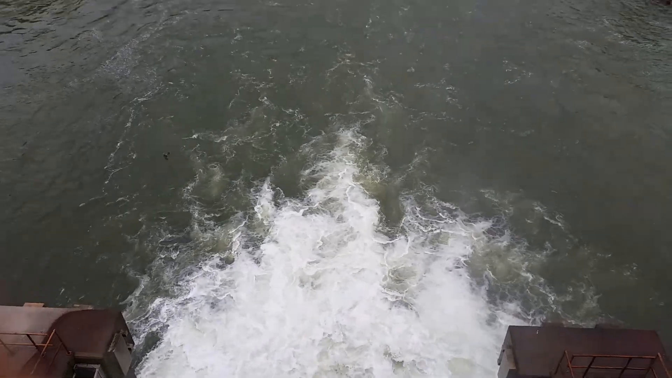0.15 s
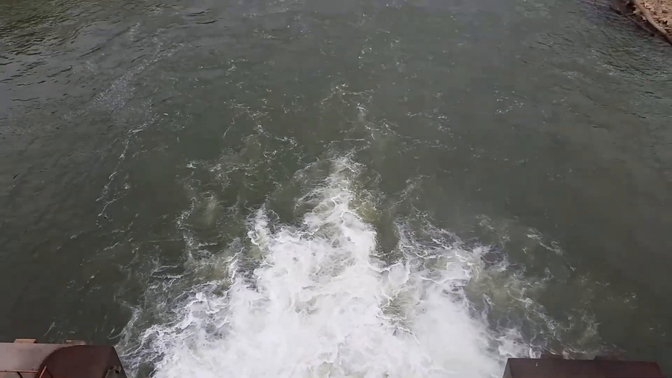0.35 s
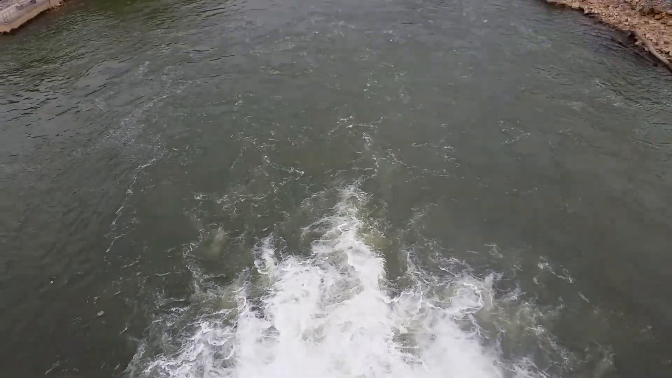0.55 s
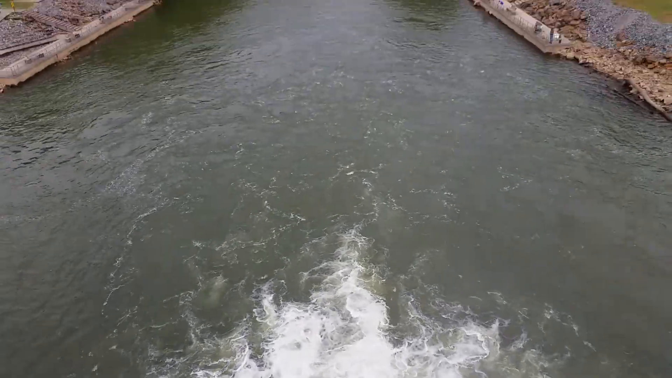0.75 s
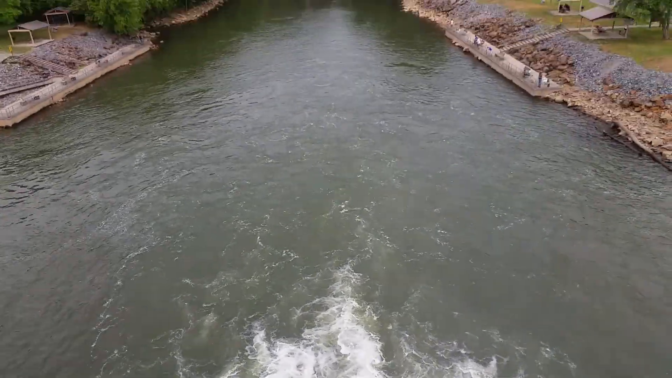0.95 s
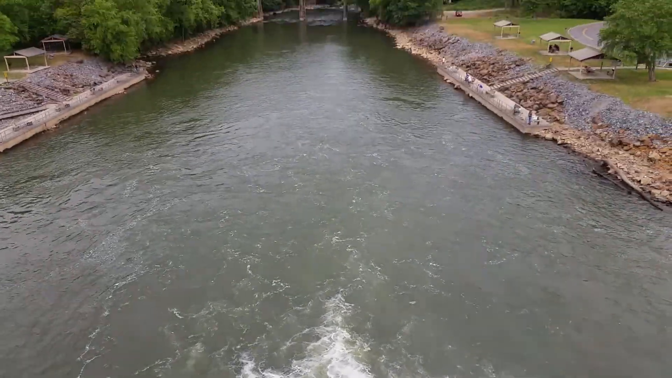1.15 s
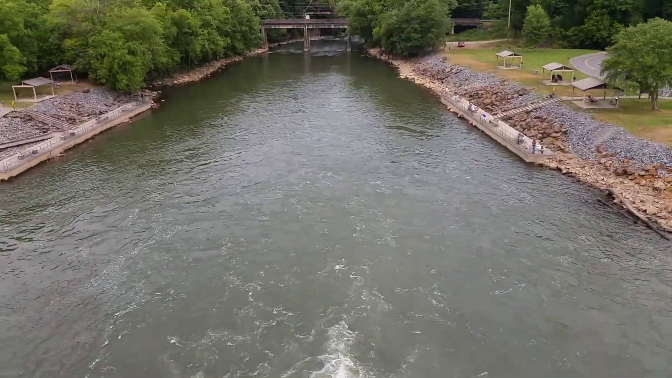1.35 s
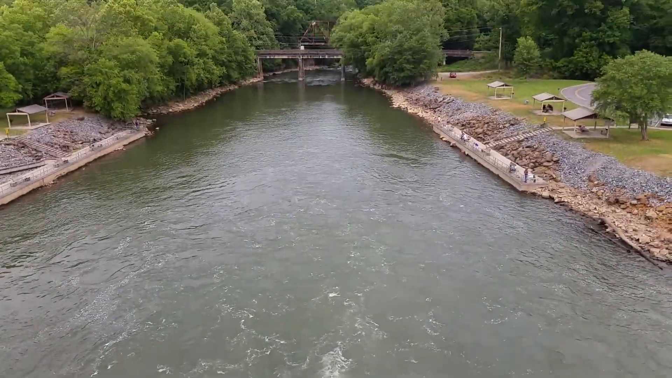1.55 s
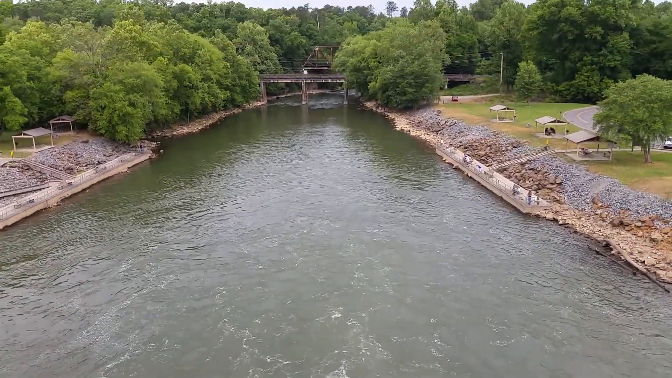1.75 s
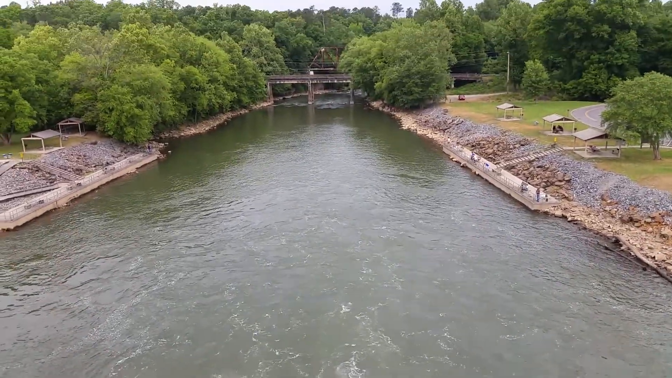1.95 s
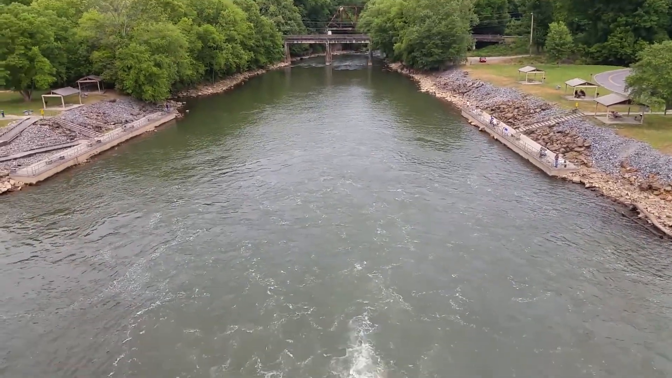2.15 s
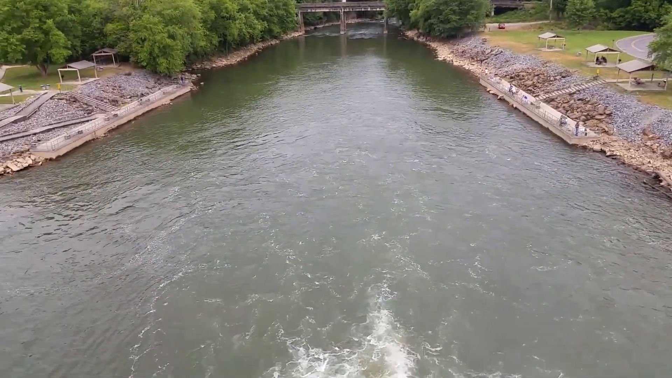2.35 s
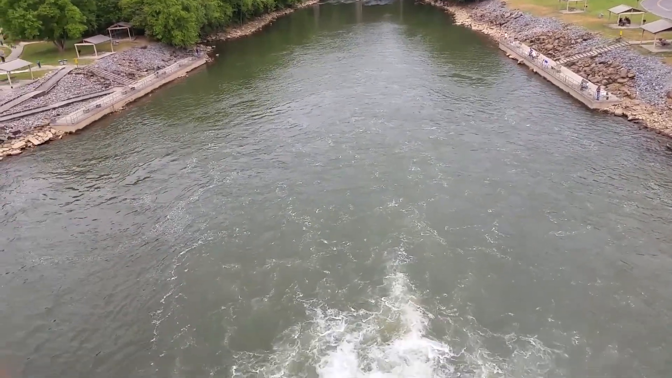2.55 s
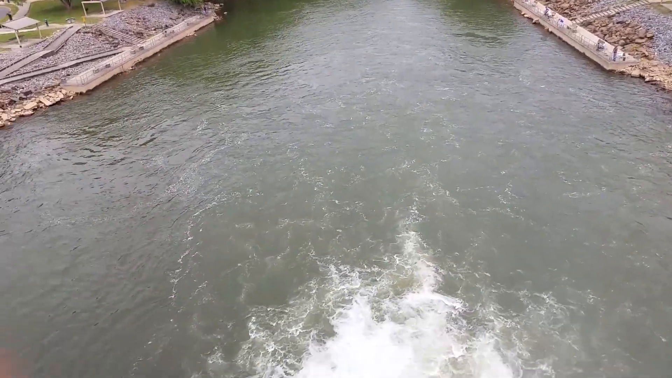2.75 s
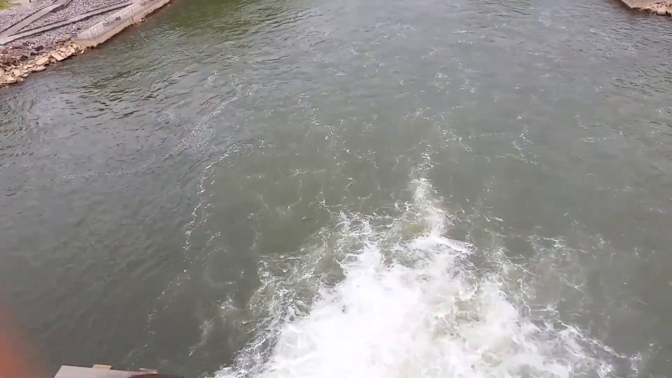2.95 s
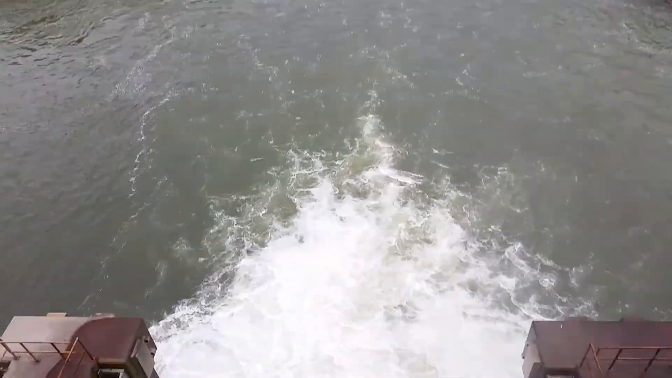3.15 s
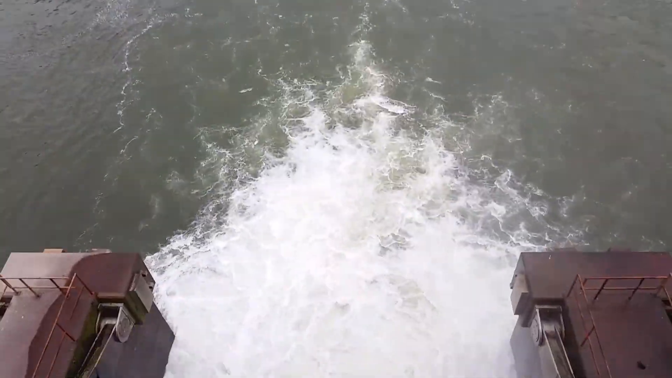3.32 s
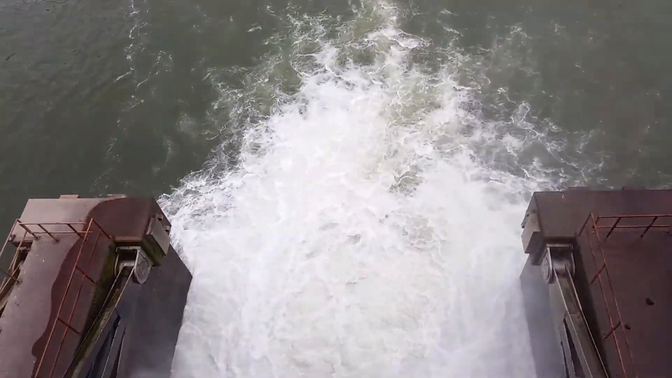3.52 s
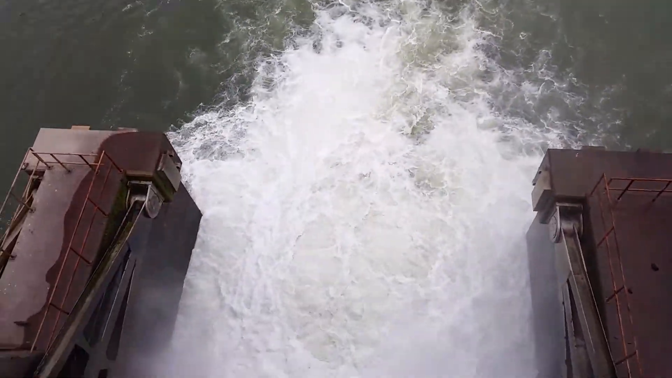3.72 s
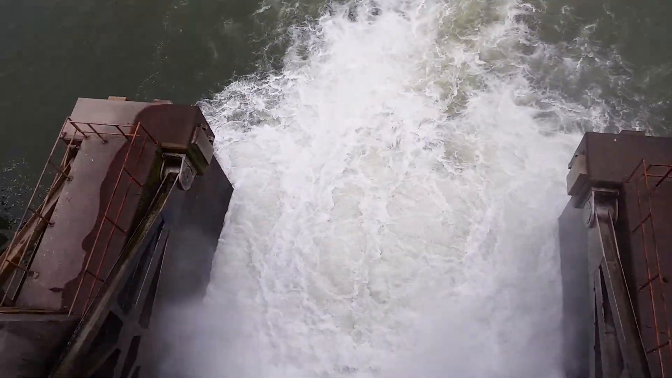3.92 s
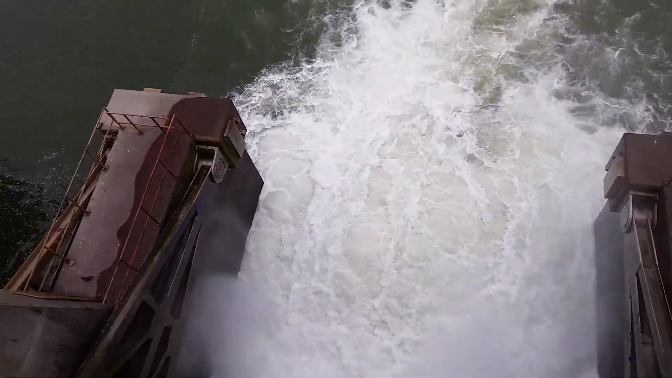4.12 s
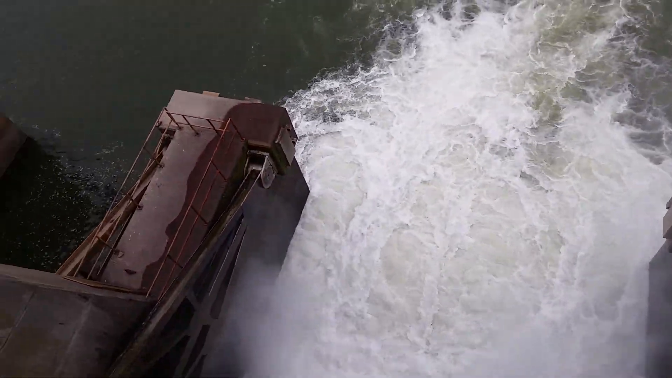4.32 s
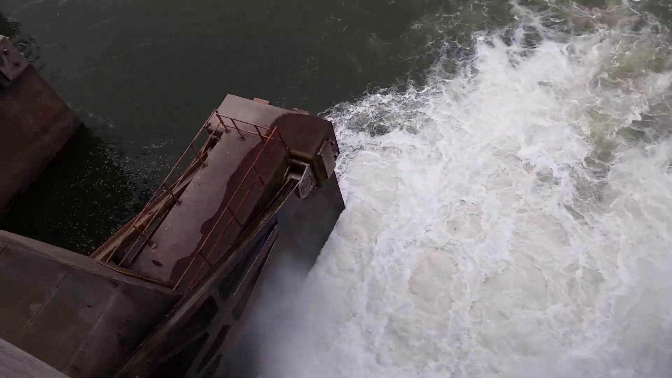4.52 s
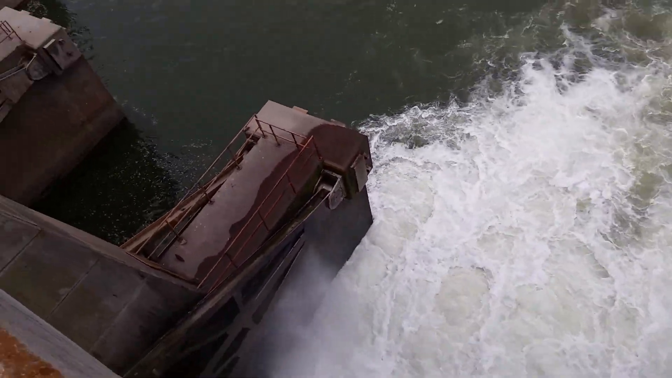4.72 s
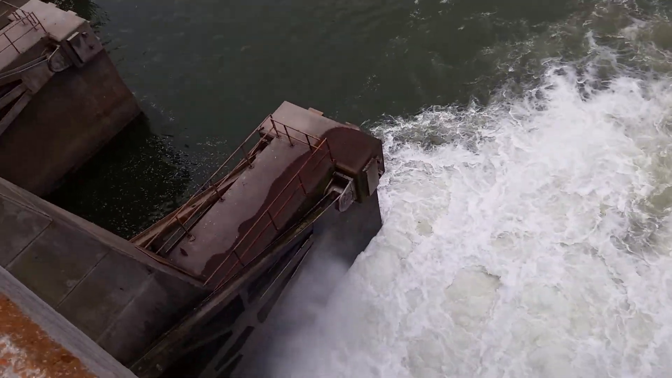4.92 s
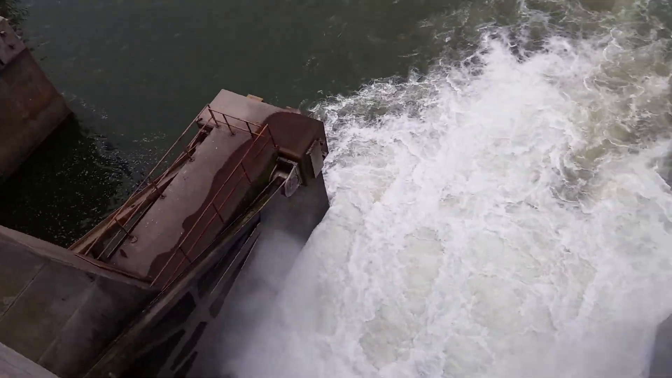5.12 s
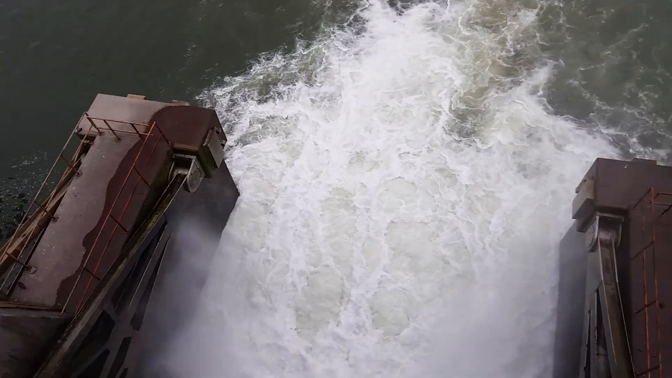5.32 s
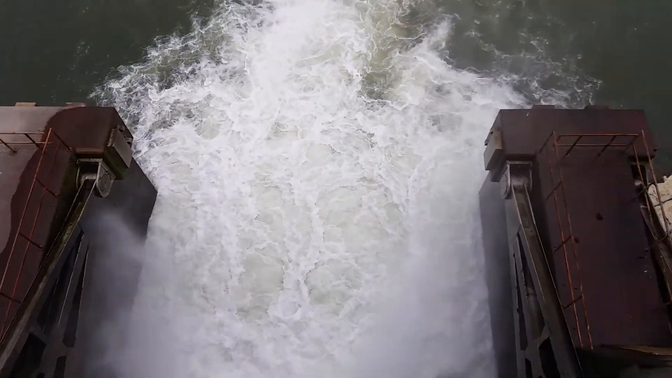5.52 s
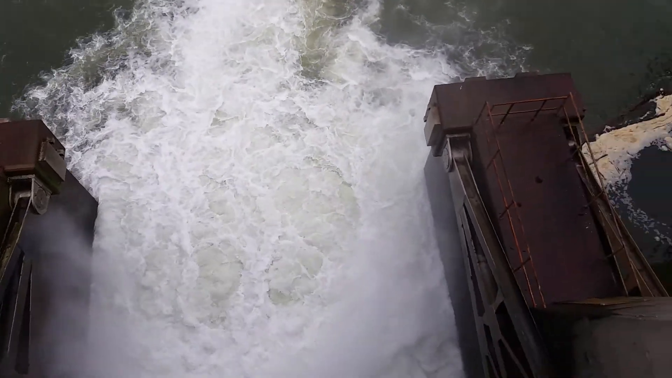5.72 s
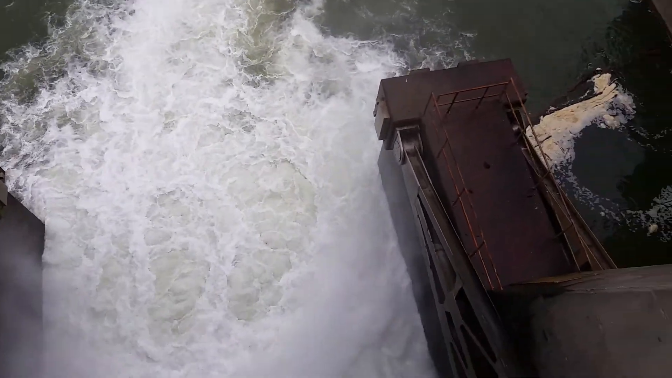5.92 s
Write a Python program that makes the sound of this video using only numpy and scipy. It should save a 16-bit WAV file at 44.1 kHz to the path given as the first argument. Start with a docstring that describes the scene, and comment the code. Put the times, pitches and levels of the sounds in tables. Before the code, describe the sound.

Dense white-water roar from a dam outlet fades in, buffeted by low wind thumps midway, then grows brighter and hissier as the view tips down.

```python
"""Below a dam, white water roars out of an outlet gate, heard through a phone with two unlike microphone ports.
The roar is noise and splats, coloured per port; as the phone tips toward the outflow the spray's hiss opens.
Wind is lumpy low noise on each port with hard thumps; finger ticks are short case rings with a push of air.
A gain control ducks the peaks, and the whole fades in from silence."""
import sys
import numpy as np
from scipy import signal
from scipy.fft import rfft, irfft, next_fast_len
from scipy.io import wavfile
from scipy.ndimage import uniform_filter1d, minimum_filter1d, map_coordinates

SR = 44100
rng = np.random.default_rng(int(sys.argv[2]) if len(sys.argv) > 2 else 0)


def dump(signal):
    """Clip the signal to [-1, 1] and save it as 16-bit WAV at the path in sys.argv[1]."""
    limited = np.clip(np.atleast_2d(signal).T, -1, 1)
    pcm = np.round(limited * 32767).astype(np.int16)
    wavfile.write(sys.argv[1], SR, pcm)


N = 263277  # length in samples

# Wind on the ports, a gust that swings from side to side.
# Each row: time in seconds, left level in dB, right level in dB.
WIND_LEVELS = [(.3, -40, -43), (1.4, -42, -38), (1.75, -22, -21), (1.9, -17, -41), (2.0, -28, -36),
               (2.1, -19, -30), (2.3, -24, -18), (2.6, -21, -16.5), (2.8, -20, -16), (2.9, -13, -16),
               (3.0, -20, -28), (3.1, -10.5, -20), (3.2, -18, -21), (3.35, -25, -16.5), (3.7, -39, -33),
               (4.8, -46, -36), (5.97, -42, -44)]


def amp(db):
    """Decibels to linear amplitude."""
    return 10 ** (np.asarray(db) / 20)


def unit(x):
    """Each channel scaled to rms 1."""
    return x / np.sqrt(np.mean(x ** 2, axis=-1, keepdims=True) + 1e-20)


def along(points, hz):
    """Columns of (Hz, value, ..) points read at frequencies hz on a log axis."""
    f, *cols = np.transpose(points)
    return np.array([np.interp(np.log(hz + 1), np.log(f + 1), c) for c in cols])


def curves(rows, t):
    """Columns of (seconds, value, ..) rows read at times t."""
    s, *cols = np.transpose(rows)
    return np.array([np.interp(t, s, c) for c in cols])


def wobble(rate, t):
    """A smooth random curve with rate knots a second."""
    knots = rng.standard_normal(int(N * rate / SR) + 4)
    return map_coordinates(knots, [t * rate])


def filtered(x, response):
    """x shaped by a gain that is a function of frequency."""
    size = next_fast_len(N + SR // 2)
    spectrum = rfft(x, size) * response(np.fft.rfftfreq(size, 1 / SR))
    return irfft(spectrum, size)[..., :N]


def patches(shape, width, length):
    """A random field of standard deviation 1, smoothed over width bins and length frames."""
    field = uniform_filter1d(rng.standard_normal(shape), width, 0)
    field = uniform_filter1d(field, length, 1)
    return field / field.std()


def splashes(rate, share, size_db):
    """Countless bursting bubbles: steady noise with a share of its power in sharper splats, rate a second."""
    hit = rng.random((2, N)) < rate / SR
    size = amp(size_db * rng.uniform(-0.89, 1, (2, N)))
    splat = hit * size * rng.standard_normal((2, N))
    steady = rng.standard_normal((2, N))
    return np.sqrt(1 - share) * steady + np.sqrt(share) * unit(splat)


def water():
    """The roar: splash noise coloured by each port, moving from shadowed to open as the phone tips."""
    # Each row: time in seconds, roar level in dB of the 1.8-3 kHz band before surge and churn.
    roar = [(.3, -38.5), (.7, -40.5), (.9, -38.5), (2.0, -38.5), (2.5, -38.5), (2.6, -40.5), (2.95, -37.5),
            (3.25, -39.5), (3.7, -37), (4.6, -37.5), (4.95, -35.5), (5.3, -37), (5.97, -36.5)]
    # Each row: time in seconds, left facing, right facing (0 shadowed, 1 facing, below 0 deeper in shadow).
    facing_rows = [(.6, -0.16, -.19), (.9, -.02, -.02), (2.35, 0.043, 0.034), (2.78, -0.081, -.14),
                   (3.1, 0.11, 0.53), (3.2, 0.71, 0.35), (3.26, .72, 0.96), (3.4, 1, 0.97), (5.2, 0.9, 1),
                   (5.97, 1.05, .93)]
    # Colour of the roar at each port, shadowed and facing the outflow.
    # Each row: frequency in Hz, relative density in dB per Hz.
    left_shadowed = [(60, -40.5), (130, -47), (250, -48.5), (370, -55.5), (550, -59), (1100, -64.5),
                     (2200, -61.5), (3000, -68), (4000, -72.5), (5200, -78), (7000, -86), (8600, -82),
                     (10200, -65), (15800, -88)]
    right_shadowed = [(60, -40.5), (130, -43.5), (300, -48.5), (550, -62.5), (750, -60), (1400, -69.5),
                      (2300, -68), (3000, -78), (4000, -76.5), (6000, -83.5), (8800, -99), (11000, -87),
                      (13500, -80), (15600, -72.5)]
    left_open = [(60, -39.5), (130, -49.5), (250, -47.5), (370, -59), (550, -53), (1100, -61), (2200, -65),
                 (3000, -69), (3700, -69.5), (4700, -73.5), (7000, -75.5), (10200, -59), (13000, -65),
                 (15800, -69.5)]
    right_open = [(60, -42.5), (130, -41), (370, -54), (550, -53), (1000, -58), (1900, -59.5), (2800, -72),
                  (3500, -69.5), (4400, -76.5), (6000, -72.5), (8800, -86.5), (11000, -72.5), (13500, -67),
                  (15600, -57)]
    # The two ports compared. Each row: frequency in Hz, likeness shadowed (0-1), likeness facing (0-1),
    # left lead shadowed in radians, left lead facing in radians.
    ports = [(30, 0.77, 1, 1.5, 1), (118, 1, 0.96, -0.1, -0.5), (298, 0.98, 0.96, -0.5, 0.2),
             (580, 0.99, 0.86, 1.6, -0.04), (750, 1, 0.94, -1.5, 0.5), (950, 0.58, 0.72, 0.9, 1.57),
             (1520, 0.18, 0.64, 2.5, -1.5), (1950, 0.68, 0.04, 4, -3), (2230, 0.81, 0.28, 6.5, -6),
             (3010, 0.26, 0.11, 6.5, -6), (3130, 0.87, 0.34, 10, -11), (4110, 0.32, 0.026, 10.5, -12.5),
             (7960, .01, .01, 23.5, -19.5)]
    # Each row: time in seconds, lift of the hiss around 5 kHz in dB.
    hiss_lift = [(.3, -4), (1.2, 1.5), (1.8, 3), (2.4, 1), (2.7, -1.5), (3.1, -2.5), (3.4, 0), (5.97, -0.5)]
    frame = 512  # samples

    hz, t, (a, b) = signal.stft(splashes(rate=2500, share=.12, size_db=5), SR, nperseg=frame)
    bin_hz = hz[:, None]
    facing = np.clip(curves(facing_rows, t), -.5, 1.2)[:, None]
    shadowed = np.vstack([along(left_shadowed, hz), along(right_shadowed, hz)])[..., None]
    exposed = np.vstack([along(left_open, hz), along(right_open, hz)])[..., None]
    colour = amp((1 - facing) * shadowed + facing * exposed)
    colour /= np.sqrt(1 + (50 / (bin_hz + 1)) ** 4)  # the pool booms little below its lowest swell
    hiss_bell = np.exp(-(np.log((bin_hz + 1) / 5200) / 0.65) ** 2)
    colour *= amp(curves(hiss_lift, t) * hiss_bell)
    # scale each moment so that the 1.8-3 kHz band has rms 1 over the two ports
    band = (hz > 1800) & (hz < 3000)
    colour /= np.sqrt(np.mean(colour[:, band] ** 2, axis=(0, 1)) * band.mean() / 2)

    # long waves reach both ports alike, short ones differ and arrive shifted
    like_shadowed, like_facing, lead_shadowed, lead_facing = along(ports, hz)[..., None]
    tip = np.clip(facing.mean(axis=0), 0, 1)
    likeness = np.clip((1 - tip) * like_shadowed + tip * like_facing, 0, 1)
    turn = np.arccos(likeness) / 2
    shift = np.exp(.5j * ((1 - tip) * lead_shadowed + tip * lead_facing))  # half the lead on each port
    left = (np.cos(turn) * a + np.sin(turn) * b) * shift
    right = (np.cos(turn) * a - np.sin(turn) * b) / shift

    # the boil surges as a whole and in patches of pitch and time
    surge_db = 0.49 * wobble(4.047, t) + 0.16 * wobble(14, t)
    churn_db = 0.44 * patches(a.shape, width=22, length=30) + 0.73 * patches(a.shape, width=5, length=7)
    level = amp(curves(roar, t) + surge_db + churn_db)
    return signal.istft(np.array([left, right]) * colour * level, SR, nperseg=frame)[1][:, :N]


def wind():
    """Eddies buffet each port on its own: low noise in lumps, with hard thumps on top."""
    # Each row: frequency in Hz, relative density of the buffeting in dB per Hz.
    buffet = [(15, -36), (30, -20), (60, 5), (90, 1), (150, -3), (250, -10), (400, -26.5), (800, -28.5),
              (3000, -61)]
    t = np.arange(N) / SR
    lumps = amp([2.0 * wobble(22.0, t), 4.5 * wobble(22.05, t)])
    eddies = filtered(rng.standard_normal((2, N)), lambda hz: amp(along(buffet, hz)))
    return amp(curves(WIND_LEVELS, t)) * unit(lumps * eddies) + thumps()


def thumps(count=40):
    """Hard eddies, each a cycle or two of pressure under a bell; count lesser ones come by chance."""
    # The hardest eddies. Each row: time in seconds, port (0 left, 1 right), bell peak in dB, pitch in Hz.
    hardest = [(1.911, 0, -6, 140), (2.064, 0, -8, 115), (2.536, 1, -5, 150), (2.592, 1, -4.5, 144),
               (2.606, 0, -5, 135), (2.739, 1, -1, 107), (2.769, 1, -4, 120), (2.804, 1, 3.5, 94),
               (2.883, 0, -2, 125), (2.965, 1, -4, 110), (3.014, 0, -5.5, 109), (3.083, 1, -7, 181),
               (3.106, 0, -3, 110), (3.193, 0, -5, 121), (3.207, 1, 1, 200), (3.27, 1, 0, 165)]
    length_cycles = 1.23  # width of the bell between its 1/e points
    over_wind_db, centre_hz, spread = 8, 119, 0.32  # lesser thumps: bell peak over the wind, pitch, +- share
    half = SR // 20
    out, t = np.zeros((2, N)), np.arange(-half, half) / SR

    when, side, pitch = rng.random((count, 3)).T
    when = .5 + when * (N / SR - 1)
    on_right = side > .5
    left_wind_db, right_wind_db = curves(WIND_LEVELS, when)
    peak_db = np.where(on_right, right_wind_db, left_wind_db) + over_wind_db
    pitch_hz = centre_hz * (1 + spread * (2 * pitch - 1))
    rows = np.vstack([hardest, np.transpose([when, on_right, peak_db, pitch_hz])])

    phases = rng.uniform(0, 2 * np.pi, len(rows))
    for (s, port, db, hz), phase in zip(rows, phases):
        bell = amp(db) * np.exp(-(2 * hz * t / length_cycles) ** 2)
        start = round(s * SR) - half
        out[int(port > .5), start:][:len(t)] += bell * np.cos(2 * np.pi * hz * t + phase)
    return out


def finger():
    """Each tick rings the plastic case briefly and pushes air into the left port."""
    # Each row: start in seconds, left ring level in dB, right ring level in dB, air push level in dB.
    ticks = [(3.143, -17, -32, -30), (3.1503, -11, -21, -22), (3.1646, -14, -28, 0), (3.1682, 1, -16, -25)]
    # Modes of the case. Each row: frequency in Hz, level in dB, time to decay by 60 dB in seconds.
    case_modes = [(1550, 0, .0045), (3100, 0, .004), (3800, -3, .0035)]
    out, t = np.zeros((2, N)), np.arange(SR // 40) / SR
    ring = np.zeros(len(t))
    for k, (hz, db, t60) in enumerate(case_modes):
        ring += (-1) ** k * amp(db - 60 * t / t60) * np.sin(2 * np.pi * hz * t)  # modes alternate in sign
    ring *= (1 - np.exp(-t / .0002)) ** 2  # a fingertip lands softly
    sharp_push = np.exp(-((t - .0004) / .0002) ** 2)
    slow_rebound = .45 * np.exp(-((t - .002) / .0008) ** 2)
    push = sharp_push - slow_rebound
    for s, left_db, right_db, push_db in ticks:
        tick = amp([[left_db], [right_db]]) * ring + [[amp(push_db)], [0]] * push
        out[:, round(s * SR):][:, :len(t)] += tick
    return out


def gain_control(x, knee_db, strength, hold_s):
    """Both channels duck together around any peak over the knee in either port."""
    size = int(hold_s * SR)
    peak = -minimum_filter1d(-np.abs(x).max(axis=0), size=size)
    needed = np.minimum(1, amp(knee_db) / (peak + 1e-9)) ** strength
    return x * uniform_filter1d(needed, size=size)


def scene():
    """Roar, wind and finger ticks summed at the two ports."""
    return water() + wind() + finger()


def record(dry):
    """Gain control, a straight fade-in from silence, a bass roll-off and the band limit."""
    # Start and end of the fade-in in seconds.
    fade_s = (.265, .965)
    top_hz, bass_hz = 15750, 26
    fade = np.interp(np.arange(N) / SR, fade_s, [0, 1])
    level = gain_control(dry, knee_db=-2, strength=.9, hold_s=0.032)
    limited = filtered(level * fade, lambda hz: (hz < top_hz) / np.sqrt(1 + (bass_hz / (hz + 1)) ** 4))
    return limited * (fade > 0)  # filter ringing ahead of the fade stays silent


dry = scene()
out = record(dry)
dump(out)
```